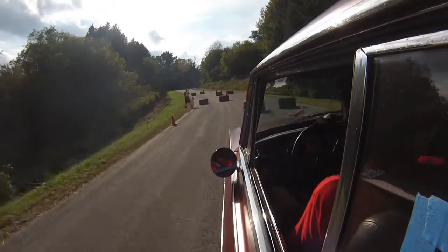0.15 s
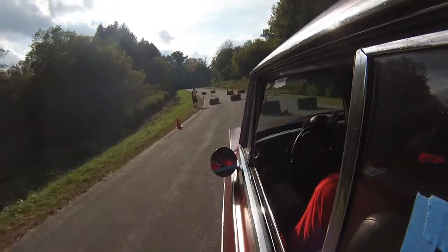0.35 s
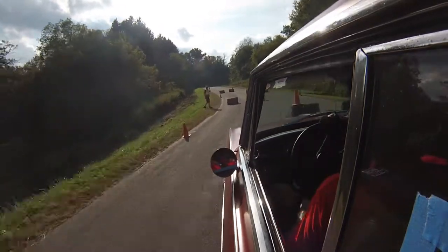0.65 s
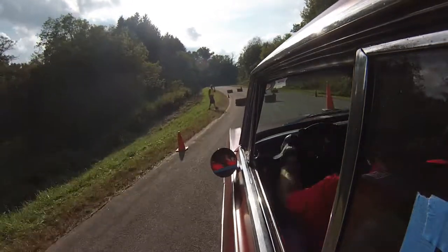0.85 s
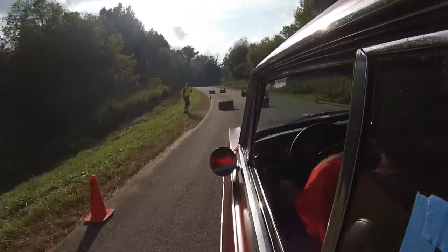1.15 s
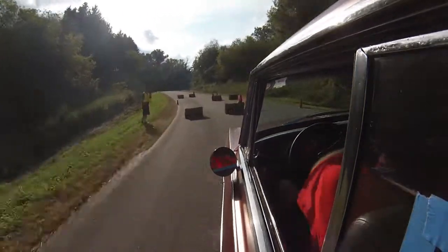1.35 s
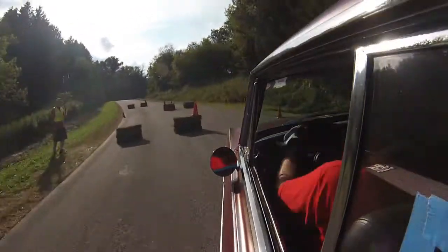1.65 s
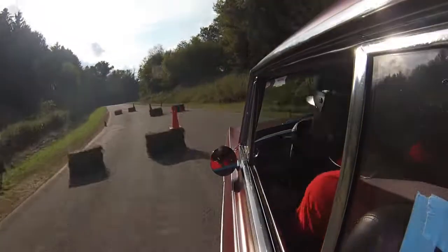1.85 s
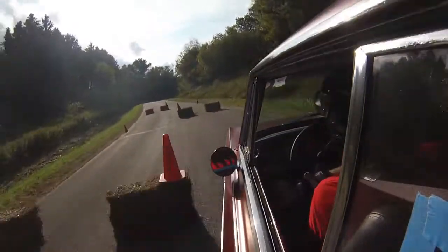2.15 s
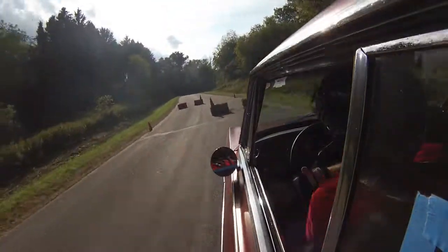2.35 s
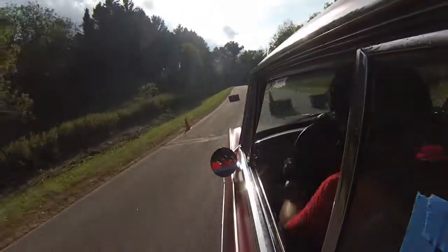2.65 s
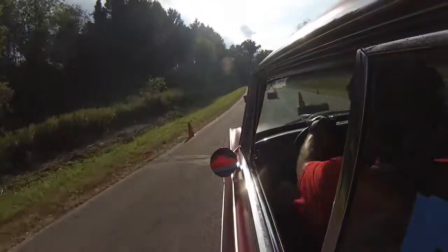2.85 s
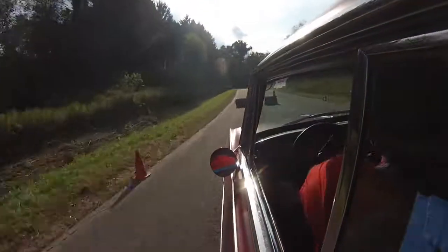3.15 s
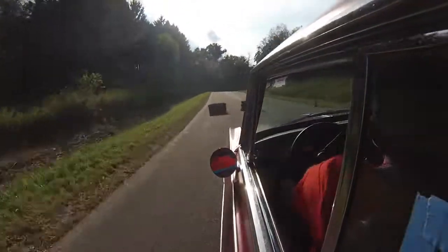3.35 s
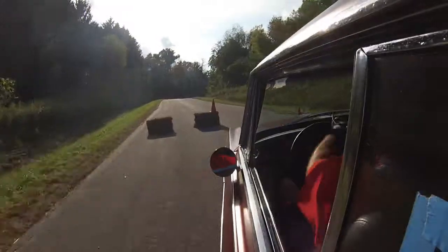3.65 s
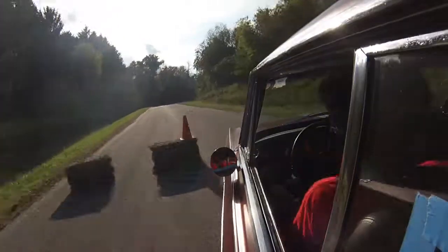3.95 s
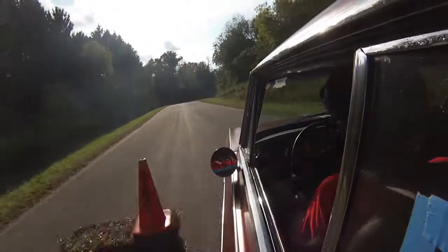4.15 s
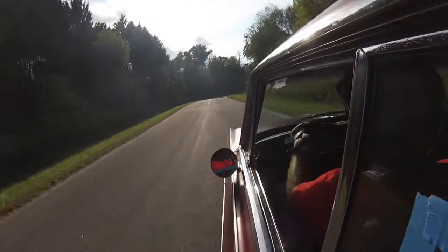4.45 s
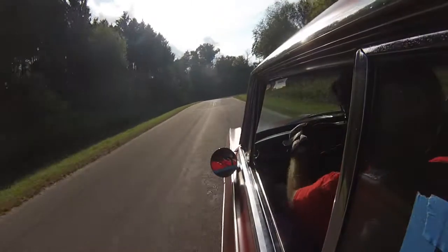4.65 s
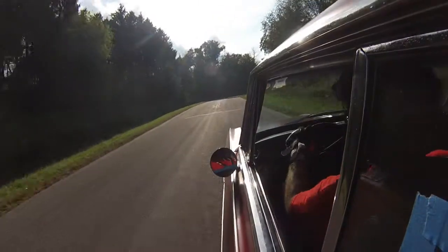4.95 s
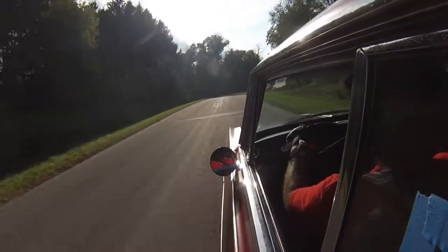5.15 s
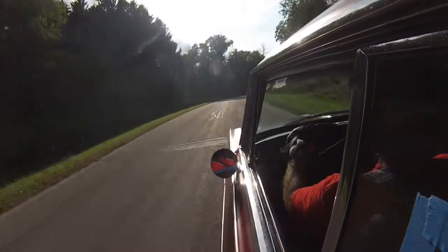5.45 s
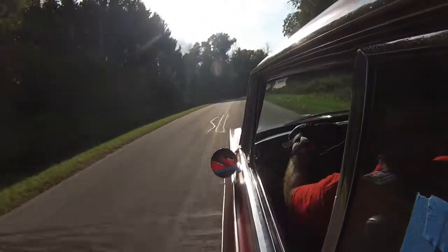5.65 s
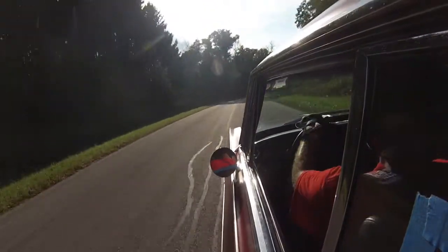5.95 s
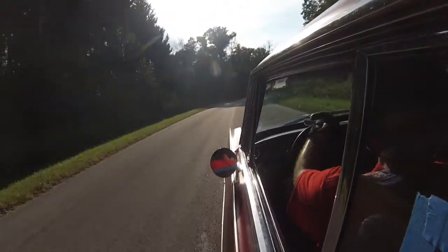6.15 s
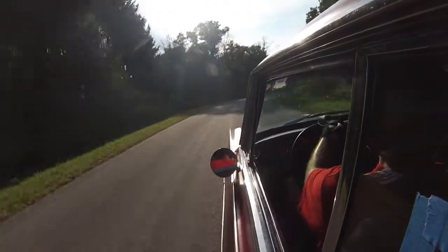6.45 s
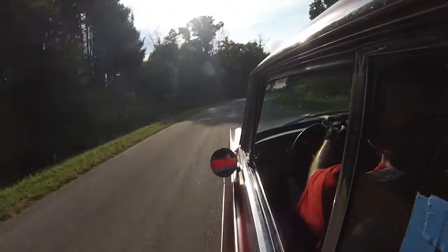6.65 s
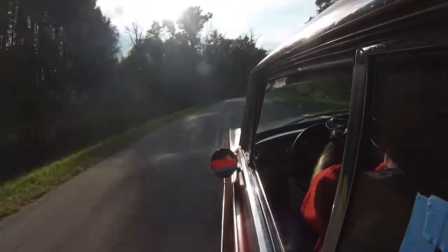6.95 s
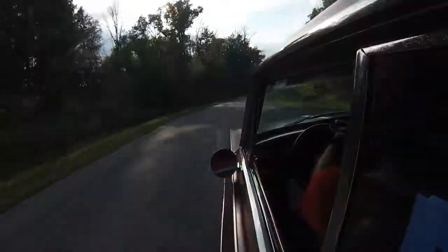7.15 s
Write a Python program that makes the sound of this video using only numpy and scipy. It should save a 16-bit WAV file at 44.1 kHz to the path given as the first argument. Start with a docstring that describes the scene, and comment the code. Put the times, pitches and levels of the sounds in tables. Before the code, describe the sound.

Heard just outside a moving hot rod, uneven exhaust growls softly, builds to a hard metallic roar, dips for a gear change, then climbs again.

```python
"""On a hill course, just outside the driver's window of a V8 hot rod: it threads chicanes on a light throttle,
pulls hard, shifts up at five seconds and pulls again. The near bank's uneven firings are pulse trains that
bark, crack and ring through an open side pipe, with rasp and hiss of turbulent gas; engine orders drone and sing.
Wind at the window is an unsteady low throb amid filtered noise; tyres and body are filtered noise below."""
import sys
import numpy as np
from scipy import signal
from scipy.fft import rfft, irfft, next_fast_len
from scipy.io import wavfile
from scipy.ndimage import uniform_filter1d

SR = 44100
rng = np.random.default_rng(int(sys.argv[2]) if len(sys.argv) > 2 else 0)


def unload_wav(signal):
    """Save mono or channel-first audio to the path in sys.argv[1] as 16-bit WAV at rate SR, clipped to [-1, 1]."""
    wavfile.write(
        sys.argv[1],
        SR,
        np.round(np.clip(np.atleast_2d(signal).T, -1, 1) * 32767).astype(np.int16),
    )


N = 321930

# engine speed: (time [s], four-stroke cycles [per s])
ENGINE_SPEED = [(0.0, 20.0), (0.23, 19.62), (0.3, 19.76), (0.53, 23.25), (0.8, 27.41), (0.95, 28.24),
                (1.33, 30.28), (1.43, 30.54), (1.65, 32.11), (1.73, 31.0), (1.83, 29.68), (2.18, 30.23),
                (2.33, 29.6), (2.45, 30.59), (2.55, 30.39), (2.75, 30.92), (3.08, 32.59), (3.25, 33.45),
                (3.35, 35.09), (3.63, 36.71), (3.75, 38.31), (4.0, 38.03), (4.18, 41.8), (4.3, 43.2),
                (4.55, 48.79), (4.88, 52.49), (4.95, 52.02), (5.0, 49.26), (5.25, 43.13), (5.33, 44.71),
                (5.41, 43.11), (5.5, 38.82), (5.73, 37.63), (5.86, 39.14), (5.95, 39.52), (6.15, 41.45),
                (6.55, 44.47), (6.68, 45.75), (6.8, 46.19), (7.05, 48.57), (7.15, 48.23), (7.3, 50.09)]
# how hard the engine works, as the loudness of its exhaust: (time [s], level [dB])
EFFORT = [(0.0, -35.5), (0.36, -34.5), (0.55, -29), (0.81, -27), (1.18, -36.5), (1.68, -32.5),
          (1.79, -39.0), (2.3, -35), (2.6, -30), (3.11, -32.2), (3.18, -35.5), (3.29, -31), (3.98, -24.5),
          (4.31, -18.5), (4.69, -16), (4.94, -17.0), (4.98, -18.5), (5.29, -22.5), (5.43, -19.5),
          (5.62, -22), (6.81, -18.5), (7.3, -18.5)]
# tyre and road noise, growing with road speed: (time [s], level [dB])
ROLLING = [(0, -33), (2.2, -35), (3.5, -31.5), (5.6, -28.5), (7.3, -24)]
# the pulses leave the pipe latest in the first second, at low revs, and earliest at the end of the first
# hard pull: (time [s], lateness [firing slots])
LATENESS = [(1.0, .3), (1.2, .07), (3.7, .04), (4.95, -.2), (5.3, 0)]
# which strength each firing slot takes: (0-3 the near bank's cylinders, 4 the far bank)
FIRING_ORDER = [0, 4, 1, 2, 4, 3, 4, 4]
FIRST_FIRING_S = 0.0457


def from_db(db):
    """Decibels to gain."""
    return 10 ** (np.asarray(db) / 20)


def in_time(rows):
    """The columns of a curve, at every sample."""
    s, *columns = np.transpose(rows)
    return [np.interp(np.arange(N) / SR, s, c) for c in columns]


def bell(x, centre, half_width):
    """A smooth hump of height 1."""
    return np.exp(-((x - centre) / half_width) ** 2)


def swells(rows):
    """Smooth humps of level from rows of (time [s], half length [s], level [dB])."""
    t = np.arange(N) / SR
    return sum(from_db(db) * bell(t, s, half_s) for s, half_s, db in rows)


def during(from_s, to_s, settle_s=0.057):
    """1 inside a stretch of time, with short ramps."""
    t = np.arange(N) / SR
    return np.clip(0.5 + np.minimum(t - from_s, to_s - t) / settle_s, 0, 1)


def wander(count, channels, size=5):
    """Slow chance, smoothed over a few steps; spread 1."""
    chance = rng.standard_normal((count, channels))
    slow = uniform_filter1d(uniform_filter1d(chance, size, axis=0), size, axis=0)
    return slow / slow.std()


def waver(count=400):
    """Slow chance at every sample; 400 steps make it change about ten times a second."""
    steps = wander(count=count, channels=1)[:, 0]
    return np.interp(np.linspace(0, count - 1, N), np.arange(count), steps)


def levelled(x, span=0.095):
    """Holds the running rms near 1, leaving the single pulses their shape."""
    size = int(span * SR)
    power = uniform_filter1d(uniform_filter1d(x * x, size), size)
    return x / np.sqrt(power + 1e-18)


def cut(x, hz, kind, order=2):
    """Butterworth low-, high- or band-pass."""
    return signal.sosfilt(signal.butter(order, hz, kind, fs=SR, output="sos"), x)


def colour(x, points):
    """Causal (minimum-phase) filter with the given spectrum, dying away above its last point."""
    size = next_fast_len(N + SR, real=True) // 2 * 2
    hz, db = np.transpose(list(points) + [(SR, -130)])
    bin_hz = np.arange(size // 2 + 1) * SR / size
    log_gain = np.log(from_db(np.interp(np.log(bin_hz + 1), np.log(hz), db)))
    # folding the cepstrum onto positive time gives the minimum phase
    cepstrum = irfft(log_gain)
    cepstrum[1:size // 2] *= 2
    cepstrum[size // 2 + 1:] = 0
    return irfft(rfft(x, size) * np.exp(rfft(cepstrum)))[:len(x)]


def resonate(x, modes):
    """Parallel resonances with alternating signs, from rows of (pitch [Hz], width [Hz], level [dB])."""
    out = 0
    for k, (hz, width_hz, db) in enumerate(modes):
        r = np.exp(-np.pi * width_hz / SR)
        poles = [1, -2 * r * np.cos(2 * np.pi * hz / SR), r * r]
        mode = (1 - r * r) / 2 * signal.lfilter([1, 0, -1], poles, x)
        out = out + (-1) ** k * from_db(db) * mode
    return out


def road_swing_db():
    """Road noise above its average, a measure of road speed."""
    road_db, = in_time(ROLLING)
    return road_db - road_db.mean()


def road():
    """Tyres and body rumble, growing with road speed; bumps set the body booming at its resonance."""
    # tyre and road rumble: (frequency [Hz], relative level [dB])
    rumble_spectrum = [(25, -9), (65, -11), (104, 4), (130, -12.5), (240, -17.5), (450, -18), (1000, -27.5),
                       (1350, -12), (1800, -40), (3500, -42), (4500, -55), (15000, -58)]
    # booms of the body over bumps: (time [s], half length [s], level [dB])
    bumps = [(6.92, 0.054, -21.5)]
    body_hz, body_width_hz = 106, 5.6
    tyre_noise = levelled(colour(rng.standard_normal(N), rumble_spectrum), span=0.35)
    rumble = from_db(in_time(ROLLING)[0]) * tyre_noise
    body = resonate(rng.standard_normal(N), [(body_hz, body_width_hz, 0)])
    return rumble + swells(bumps) * levelled(cut(body, 160, "low"))


def buffeting():
    """Strength of the air at the window: a breeze that grows with road speed, and gusts on top."""
    # gusts at the window: (time [s], half length [s], level [dB])
    gusts = [(.12, 0.27, -21), (.7, 0.22, -30), (2.17, 0.25, -27.5), (3.167, 0.062, -20),
             (3.39, 0.064, -16.5), (3.92, .04, -26), (4.39, 0.064, -21.5), (5.063, 0.16, -23),
             (5.544, 0.12, -22), (5.914, 0.094, -22), (6.24, 0.18, -26), (6.845, 0.093, -19.5),
             (7.172, 0.21, -20)]
    breeze_db, follows_road, waver_db = -32.5, 0.45, 0.9
    t = np.arange(N) / SR
    breeze = from_db(breeze_db + follows_road * road_swing_db() + waver_db * waver())
    gust_power = sum((from_db(db) * bell(t, s, half_s)) ** 2 for s, half_s, db in gusts)
    return np.sqrt(breeze ** 2 + gust_power)


def wind(cabin_hz=31.1, wobble_hz=1.72, turbulence=0.56):
    """Air tumbling past the open window sets the cabin throbbing unsteadily, amid broad turbulence."""
    # broad turbulence: (frequency [Hz], relative level [dB])
    eddy_spectrum = [(10, -14), (25, -4), (35, 1.5), (55, -7.5), (100, -18.5), (180, -29.5)]
    throb_hz = cabin_hz + wobble_hz * waver()
    throb = np.sqrt(2) * np.sin(2 * np.pi * np.cumsum(throb_hz) / SR)
    eddies = levelled(colour(rng.standard_normal(N), eddy_spectrum))
    return buffeting() * levelled(throb + turbulence * eddies, span=0.094)


def wide_open(half_way_db=-24, softness_db=1.9):
    """How far the throttle is towards wide open, 0 to 1, judged by the effort."""
    return 1 / (1 + np.exp((half_way_db - in_time(EFFORT)[0]) / softness_db))


def throttle_shut():
    """1 while the foot is off the throttle for the shift."""
    return during(4.972, 5.285, settle_s=0.00475)


def low_revs(smooth_rate=37):
    """1 below the engine's smooth range [cycles per s], fading to 0 across one cycle per second."""
    return np.clip(0.5 + smooth_rate - in_time(ENGINE_SPEED)[0], 0, 1)


def raggedness(coasting_db=2.0, pulling_db=0.9):
    """Depth of the firings' scatter [dB]: burning is ragged at low revs and evens out as the engine pulls."""
    low = low_revs()
    return coasting_db * low + pulling_db * (1 - low)


def layer_db(cruise_db, effort_share, db_per_octave, wide_open_db, waver_db=0.93):
    """Level of an engine layer from effort, engine speed and throttle, with a slight waver of its own."""
    cruise_rate, cruise_effort_db = 40, -20    # cycles per s, dB
    (effort_db,), (rate,) = in_time(EFFORT), in_time(ENGINE_SPEED)
    from_effort_db = effort_share * (effort_db - cruise_effort_db)
    from_speed_db = db_per_octave * np.log2(rate / cruise_rate)
    steady_db = cruise_db + from_effort_db + from_speed_db
    return steady_db + wide_open_db * wide_open() + waver_db * waver()


def singing():
    """Single engine orders swell and whine for a moment, gliding with the revs."""
    # (time [s], half length [s], level before waver [dB], multiple of the cycle rate)
    singing_orders = [(1.55, .2, -45, 25), (2.63, .1, -37, 16), (4.53, .13, -51, 103),
                      (4.62, .22, -38.5, 72), (4.7, .25, -42.5, 54), (5.18, .12, -37, 11)]
    angle = 2 * np.pi * np.cumsum(in_time(ENGINE_SPEED)[0]) / SR
    out = 0
    for *swell, k in singing_orders:
        strength = swells([swell]) * from_db(2 * waver())
        out = out + strength * np.sin(round(k) * angle + 0.5 * waver())
    return np.sqrt(2) * out


def drone(waver_db=2.0):
    """The lowest engine orders are clean tones; each booms as it sweeps through the cabin's resonance."""
    # resonance of the cabin: (frequency [Hz], relative level [dB])
    cabin_response = [(66, -21), (85, -4), (108, 4), (130, 0.5), (160, -4.5), (200, -5.5), (260, -22),
                      (380, -25)]
    # orders in the boom: (multiple of the cycle rate, relative level [dB])
    boom_orders = [(2, -7.5), (3, 0), (4, -14), (5, -2), (6, -6.5), (7, -11)]
    # body resonances that the firing hum sweeps through: (frequency [Hz], relative level [dB])
    hum_response = [(160, -17), (222, -5.5), (243, -18.5), (261, -2), (300, -25.5), (345, -25),
                    (378, -15.5), (408, -8)]
    shut_hum_db = -15    # the firing hum fades while the throttle is shut
    rate, = in_time(ENGINE_SPEED)
    firing_order = len(FIRING_ORDER)
    # the exhaust booms as the engine first takes up the load
    take_up_db = 9.7 * bell(np.arange(N) / SR, 0.48, 0.074)
    boom_db = layer_db(cruise_db=-32, effort_share=0.64, db_per_octave=-6.5, wide_open_db=2) + take_up_db
    hum_db = layer_db(cruise_db=-22, effort_share=1.1, db_per_octave=-1.5, wide_open_db=-2.5)
    hum_db = hum_db + np.interp(firing_order * rate, *np.transpose(hum_response))
    hum_db = hum_db + shut_hum_db * throttle_shut()
    angle = 2 * np.pi * np.cumsum(rate) / SR
    boom = 0
    for k, db in boom_orders:
        order_db = db + np.interp(k * rate, *np.transpose(cabin_response)) + waver_db * waver()
        boom = boom + from_db(order_db) * np.cos(k * angle)
    from_first = angle - angle[int(FIRST_FIRING_S * SR)]
    hum = -np.cos(firing_order * from_first - 2 * np.pi * in_time(LATENESS)[0])
    return np.sqrt(2) * (from_db(boom_db) * boom + from_db(hum_db) * hum)


def firings():
    """One pressure pulse per cylinder and cycle; ragged burning scatters both strength and timing."""
    # cylinders drop out and catch again: (time [s], near cylinders 1-4 [dB] x 4, far bank [dB])
    burn = [(0, -2, -9, -3, -3, -15), (.8, -1, -9, -5, 1, -17), (1.15, -3.5, 0, -2.5, 1, -7),
            (2.3, -10.5, -5, -0.5, -5, -8.5), (3.2, -1, -10, -3, 0, -10.5), (3.28, 0, -12, -6.5, -19, -9),
            (3.55, -0.5, -7, -1.5, -10, -11), (4.03, 0.5, -1, -3, -7, -13.5), (4.18, -1, 1, -6, -2.5, -18),
            (5.3, 1.5, -2.5, 4, 1.5, -11), (5.7, 0, -2.5, -6, -5, -9), (6.5, -1.5, 0.5, -5, -7.5, -14.5),
            (6.7, -4, 2.5, -9.5, -2, -16)]
    # unequal header pipes delay each slot's pulse: (delay [firing slots])
    header_lag = [0.026, -0.019, 0.0724, -0.116, -0.444, -0.023, .2, 0.047]
    shut_lateness = 1.45        # firing slots; with the throttle shut the gas is pumped out later
    jitter_s_per_db = 0.00002   # scatter of timing that goes with the scatter of strength
    t, per_cycle = np.arange(N) / SR, len(FIRING_ORDER)
    slots = np.cumsum(in_time(ENGINE_SPEED)[0]) / SR * per_cycle
    slots -= np.interp(FIRST_FIRING_S, t, slots)
    slot = np.arange(int(slots[0]), int(slots[-1]))
    place = slot % per_cycle
    late = np.interp(slot, slots, in_time(LATENESS)[0] + shut_lateness * throttle_shut())
    when = np.interp(slot + late + np.array(header_lag)[place], slots, t)
    cylinders_db = [np.interp(when, t, db) for db in in_time(burn)]
    strength_db = np.choose(np.array(FIRING_ORDER)[place], cylinders_db)
    scatter_db = np.interp(when, t, raggedness())
    # each cylinder's mixture also drifts over several cycles, so the harmonics trade strength
    drifts = [wander(count=400, channels=per_cycle).ravel() for _ in range(2)]
    strong, tardy = [(drift + 1.07 * rng.standard_normal(len(drift)))[:len(slot)] for drift in drifts]
    size = from_db(strength_db + scatter_db * strong)
    at = np.clip((when + jitter_s_per_db * scatter_db * tardy) * SR, 0, N - 2)
    # each pulse is shared between the two samples around its exact time
    whole, part = at.astype(int), at % 1
    return np.bincount(whole, size * (1 - part), N) + np.bincount(whole + 1, size * part, N)


def pipe_echo(x, round_trip_s=0.00588, share=0.4, drift_s=0.00005, escape_hz=1100):
    """The low part of each pulse returns inverted along the open pipe; the trip drifts with the gas's heat."""
    samples = np.arange(N)
    lag = (round_trip_s + drift_s * waver()) * SR
    returning = cut(x, escape_hz, "low", order=1)
    return x - share * np.interp(samples - lag, samples, returning, left=0)


def gas_puffs(pulses, decay_s, steady, rise_s=0.0013):
    """Turbulence swells just after each pulse and dies down to a steady flow."""
    gate = pulses + 1e-18
    for time_s in (rise_s, decay_s):
        gate = signal.lfilter([1], [1, -np.exp(-1 / (time_s * SR))], gate)
    return levelled((levelled(gate) + steady) * rng.standard_normal(N))


def in_hot_pipe(x, shape, table):
    """Filters on a clock that runs with the speed of sound in the pipe, so all resonances move together."""
    # resonances move with the heat of the gas: (time [s], factor on their pitch)
    pipe_tuning = [(2.6, 0.96), (3.05, 0.98), (3.8, 1.0), (4.2, .97), (4.92, 0.994), (6.1, 1.005)]
    clock = np.cumsum(in_time(pipe_tuning)[0])
    ticks = np.arange(int(clock[-1]))
    on_pipe_clock = np.interp(ticks, clock, x)
    return np.interp(clock, ticks, shape(on_pipe_clock, table))


def throttle_lift(at_s=4.972, lost=0.64, recovery_s=0.03):
    """The roar drops at once when the throttle shuts for the shift, and recovers exponentially."""
    since = np.arange(N) / SR - at_s
    return 1 - lost * np.clip(since / 0.0023, 0, 1) * np.exp(-np.abs(since) / recovery_s)


def flares(puffs):
    """Short swells of sharp, tearing gas noise, as the throttle opens or a gust hits."""
    # (time [s], half length [s], level [dB])
    flare_swells = [(4.29, 0.073, -28), (6.625, 0.013, -29), (6.825, 0.016, -27), (6.975, 0.018, -31)]
    # tearing gas: (frequency [Hz], relative level [dB])
    flare_spectrum = [(1500, -45), (2700, -5.5), (3100, -8.5), (3450, 8), (4000, -13.5), (4700, -8.5),
                      (5500, -19), (9000, -23)]
    return swells(flare_swells) * levelled(colour(puffs, flare_spectrum))


def exhaust():
    """Pulses crack and bark cleanly; higher up the pipe rings, and ever more of the sound is turbulent gas."""
    # spectra: (frequency [Hz], relative level [dB])
    bark_spectrum = [(90, -25), (190, -7.5), (315, -6), (400, -6), (480, 2), (570, 3.5), (680, 1.5),
                     (790, 2), (920, 1.5), (1040, -10), (1200, 2), (1550, -5), (1950, -14.5)]
    growl_spectrum = [(90, -24.5), (200, -2), (300, -7.5), (370, 1), (490, 5), (620, 1), (700, -2.5),
                      (790, 5), (900, -7.5), (1020, -5.5), (1180, 3), (1500, -20), (1950, -21)]    # the bark at low revs, hollower and lower
    crack_spectrum = [(200, -13), (650, -7.5), (1000, -1), (1230, 3.5), (1500, -14.5), (2000, -17)]    # the bare shock front of a pulse
    rasp_spectrum = [(1300, -30.5), (1650, -5), (1850, -9), (2170, 0), (2450, -14.5), (2720, -0.5),
                     (2950, -5.5), (3400, 0.5), (3620, 9), (3900, -11), (4250, -27), (4750, -12),
                     (5200, -31.5), (6500, -42)]      # the metallic rasp of the pipe
    hiss_spectrum = [(4250, -1), (4750, 6.5), (5200, -1.5), (6000, 2), (6600, 6), (6950, -2.5),
                     (7800, -0.5), (8700, -4.5), (11000, -3.5), (12800, -0.5), (15500, -11.5)]
    # pipe resonances: (pitch [Hz], width [Hz], relative level [dB])
    pipe_modes = [(1235.5, 160, -4.5), (1419, 134, 1.5)]
    # the pipe rings less while the throttle is eased or just reopened: (from [s], to [s], change [dB])
    dull_spells = [(1.75, 2.377, -2.5), (3.146, 3.63, -5)]
    bark_grit, rasp_grit = 0.16, 0.33    # turbulence against clean pulses, before raggedness and air
    flutter_share = 0.28     # dB of rasp flutter per dB of road noise above its average
    airstream_share = 0.63   # the passing air tears at the jet: rasp and hiss take this share of road swing

    bark_db = layer_db(cruise_db=-24, effort_share=0.9252, db_per_octave=2, wide_open_db=-4)
    crack_db = layer_db(cruise_db=-32, effort_share=1.47, db_per_octave=-0.5, wide_open_db=-3.5)
    ring_db = layer_db(cruise_db=-22, effort_share=1.5348, db_per_octave=-6, wide_open_db=0.14)
    rasp_db = layer_db(cruise_db=-35, effort_share=1.01, db_per_octave=0.5, wide_open_db=1.13)
    hiss_db = layer_db(cruise_db=-53.5, effort_share=0.88, db_per_octave=0, wide_open_db=9)
    # hard cracks as the cylinders catch again after the last chicane
    crack_db = crack_db + 8.4 * during(3.26, 3.7, settle_s=0.05)
    ring_db = ring_db + sum(db * during(from_s, to_s) for from_s, to_s, db in dull_spells)

    pulses = firings()
    shocks = -levelled(pipe_echo(pulses))
    puffs = gas_puffs(pulses, decay_s=0.005, steady=0.75)
    short_puffs = gas_puffs(pulses, decay_s=0.0014, steady=0.33)
    ragged = raggedness()    # ragged burning leaves more turbulence behind each pulse
    low, air_db = low_revs(), road_swing_db()
    puffs_in_air = from_db(air_db) * puffs    # the airstream stirs it up as the car gathers speed
    blows = shocks + bark_grit * ragged * puffs_in_air
    gritty_blows = shocks + rasp_grit * ragged ** 2 * puffs_in_air

    bark_and_growl = (1 - low) * colour(blows, bark_spectrum) + low * colour(blows, growl_spectrum)
    bark = from_db(bark_db) * levelled(bark_and_growl)
    crack = from_db(crack_db) * levelled(colour(-pulses, crack_spectrum))
    ringing = in_hot_pipe(blows, resonate, pipe_modes)
    ring = from_db(ring_db) * levelled(cut(ringing, [950, 1650], "band"))
    rasp = from_db(rasp_db) * levelled(in_hot_pipe(gritty_blows, colour, rasp_spectrum))
    hiss = from_db(hiss_db) * levelled(colour(short_puffs, hiss_spectrum))
    flutter = from_db(flutter_share * np.maximum(air_db, 0) * waver(count=1300))
    torn_gas = from_db(airstream_share * air_db) * (flutter * rasp + hiss)
    return (bark + crack + ring + torn_gas) * throttle_lift() + flares(puffs)


def scene():
    """Sums the sources on one channel; everything rides along with the microphone."""
    return (road() + wind() + singing() + drone() + exhaust())[None]


def record(dry):
    """Cuts the deepest rumble, and steeply cuts the top above 15.3 kHz."""
    without_rumble = cut(dry, 14, "high")
    top_cut = signal.ellip(10, 0.1, 80, 15300, fs=SR, output="sos")
    return signal.sosfilt(top_cut, without_rumble)


dry = scene()
out = record(dry)
unload_wav(out)
```